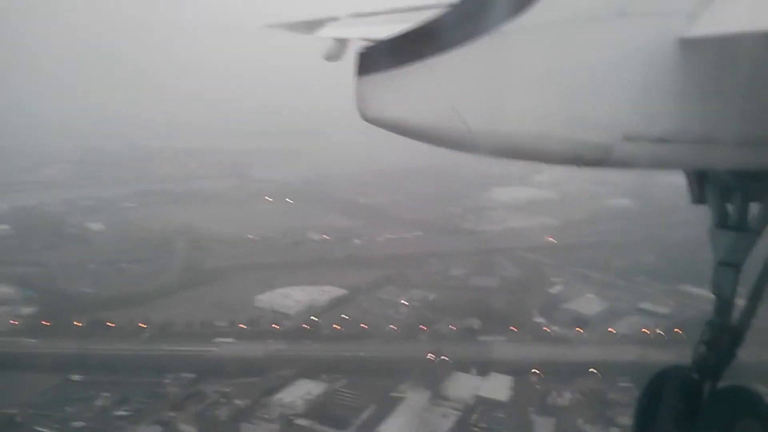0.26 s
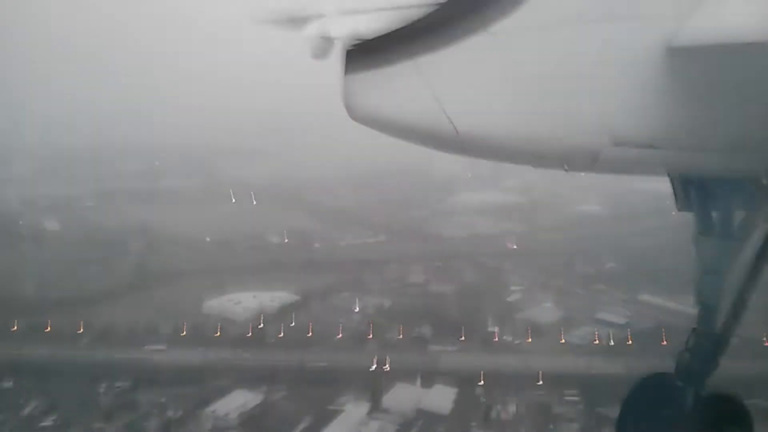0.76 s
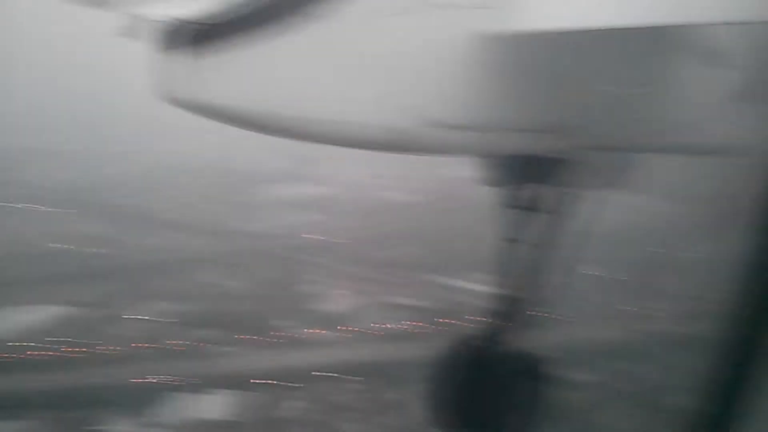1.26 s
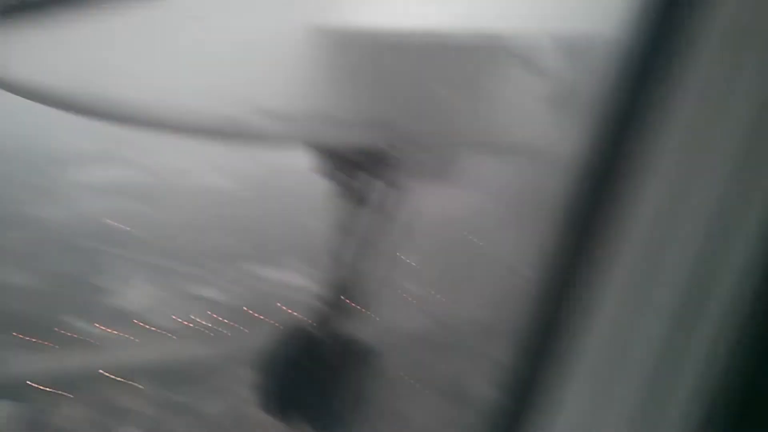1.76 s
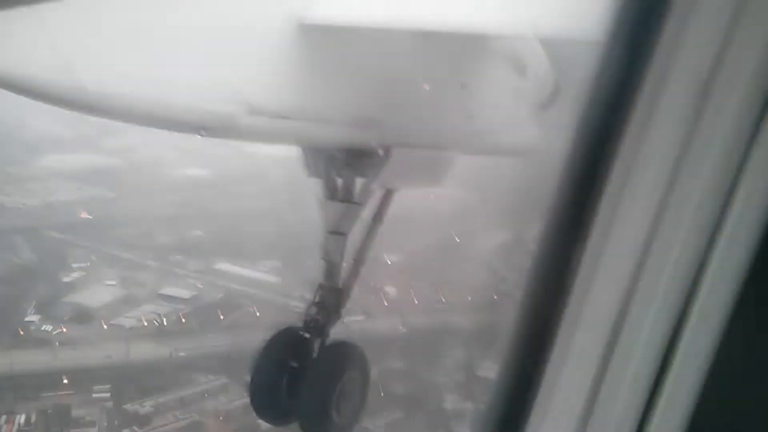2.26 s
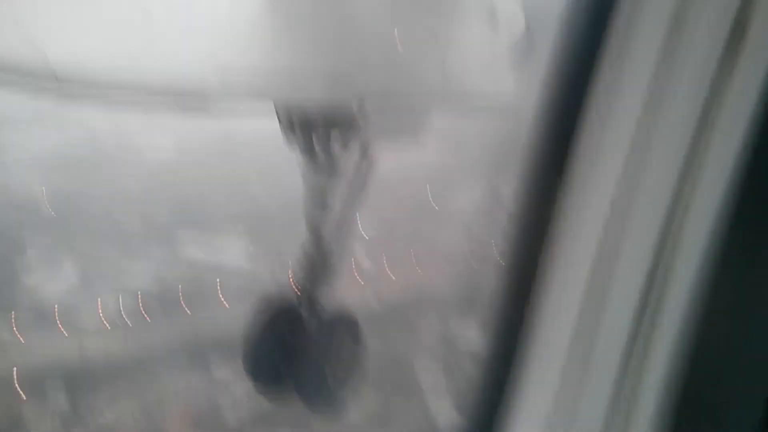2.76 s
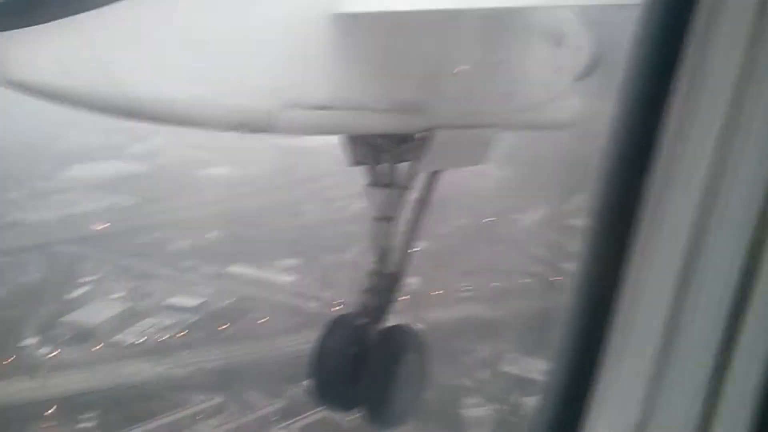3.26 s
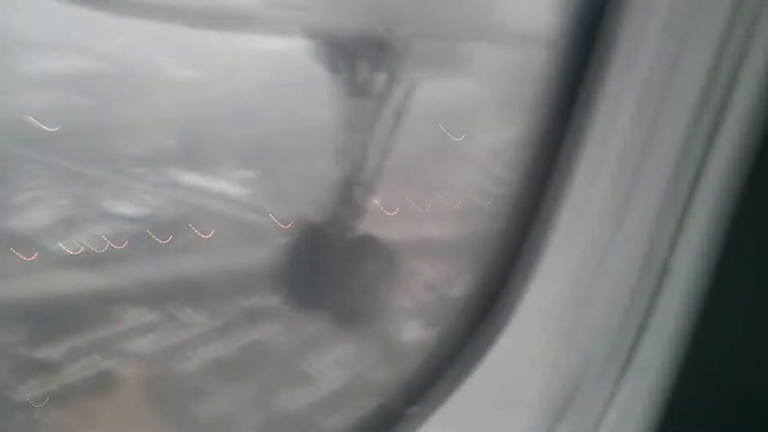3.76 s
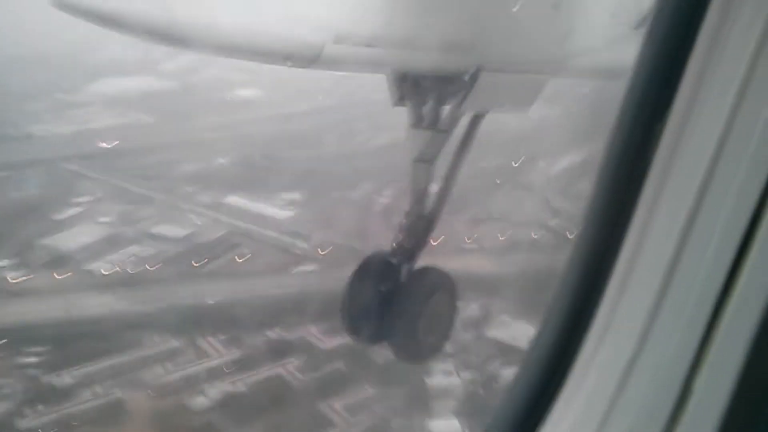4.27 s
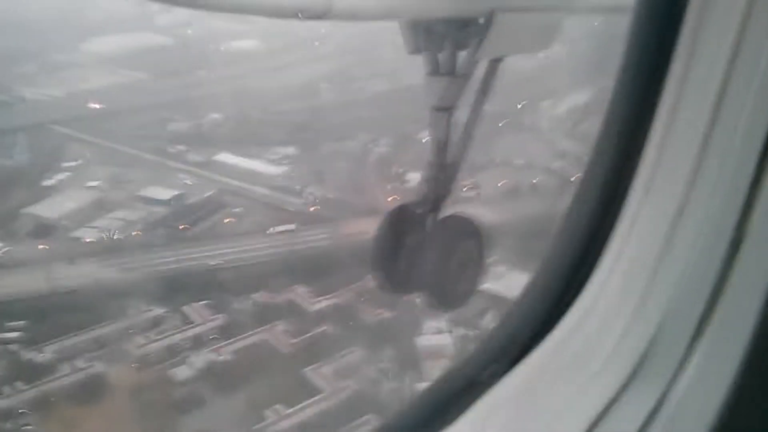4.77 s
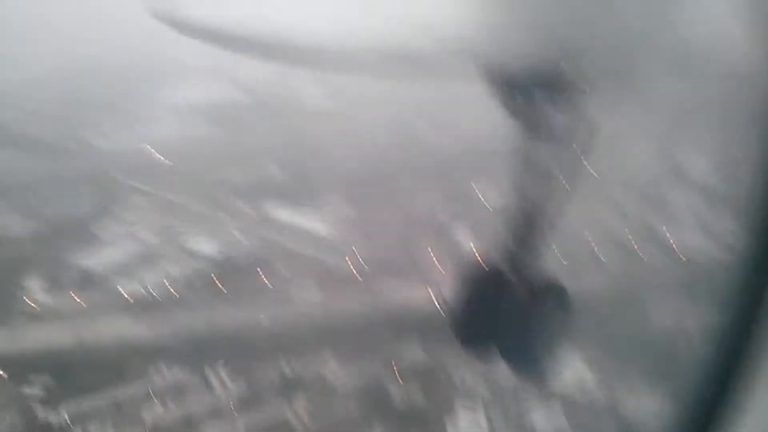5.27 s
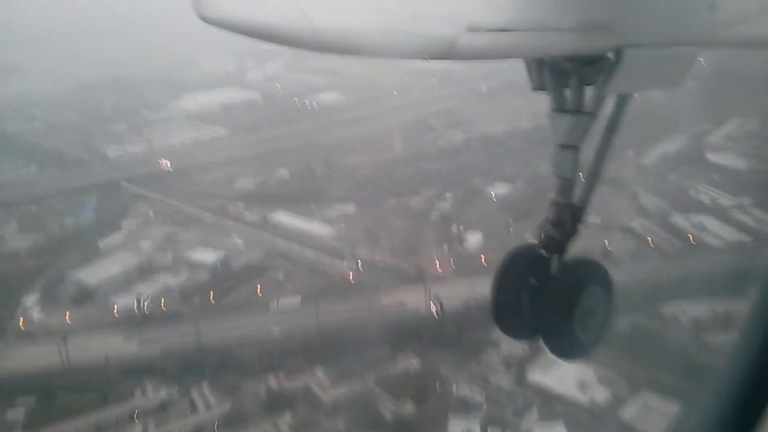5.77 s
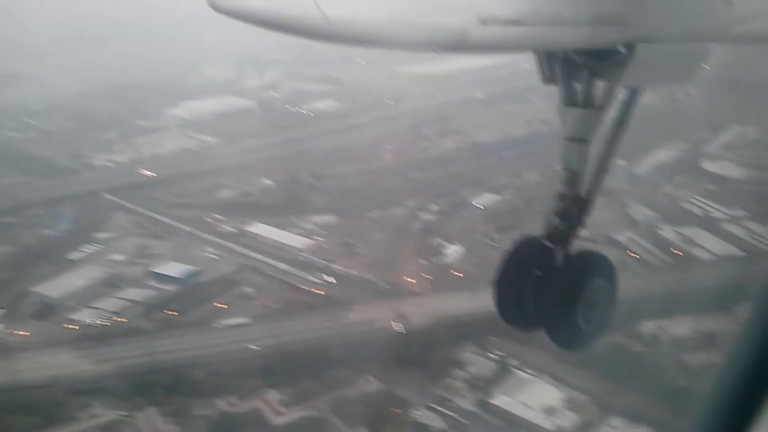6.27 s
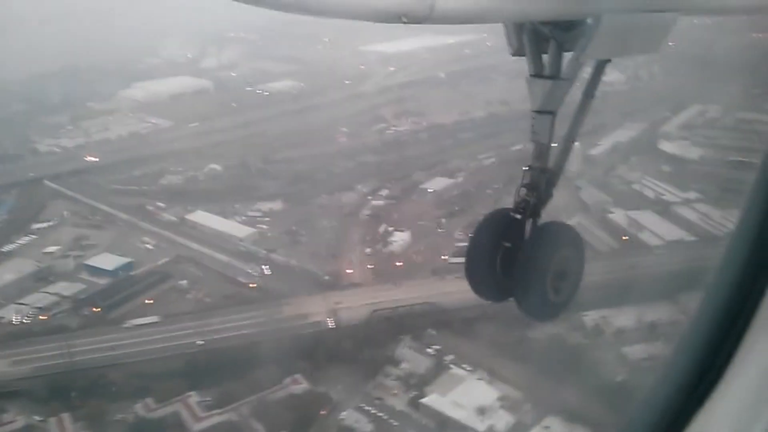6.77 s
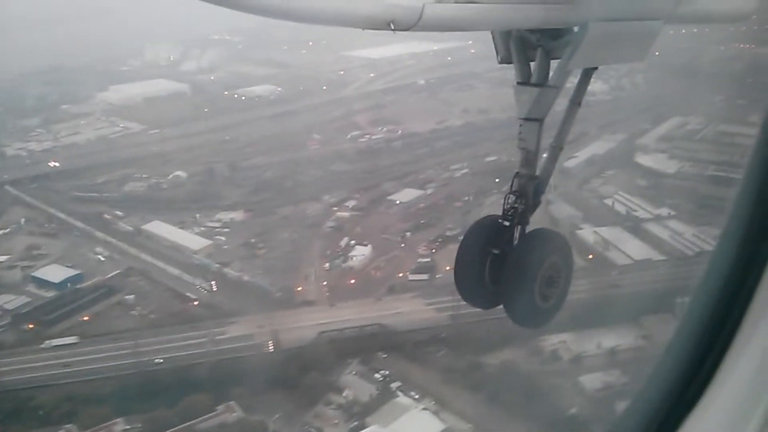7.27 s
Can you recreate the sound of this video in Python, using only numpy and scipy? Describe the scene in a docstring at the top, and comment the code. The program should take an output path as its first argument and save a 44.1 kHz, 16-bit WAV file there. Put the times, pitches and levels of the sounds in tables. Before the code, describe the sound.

Inside a propeller plane on approach, deep buffeting roar and steady engine hum continue while handling snaps and small ticks break through close by.

```python
"""Propeller airliner cabin on approach

Turbulent flow shakes the hull into a lumpy rumble and whoosh, and wall panels boom in the cabin's resonances.
The blades add a low harmonic tone and an overhead vent a bright jet hiss with a window echo.
Narrow bands of cabin noise swell and fade; fittings tick as noise puffs, and snap, knock or ring when struck.
A limiter driven by the bass and a soft saturation shape the sum.
"""
import sys
import numpy as np
from scipy import signal
from scipy.fft import rfft, irfft, next_fast_len
from scipy.io import wavfile
from scipy.ndimage import uniform_filter1d, minimum_filter1d, map_coordinates

SR = 44100
rng = np.random.default_rng(int(sys.argv[2]) if len(sys.argv) > 2 else 0)


def dump_mix(stems):
    """Bounce the given channels to the path in sys.argv[1] as a 16-bit WAV at rate SR."""
    frames = np.atleast_2d(stems).T  # one column per channel
    limited = np.clip(frames, -1, 1)  # hard clip at full scale
    pcm = np.round(limited * 32767).astype(np.int16)
    wavfile.write(sys.argv[1], SR, pcm)


N = 331191  # samples

# Airflow on the hull, before random buffeting: time_s, rumble_db, whoosh_db
AIRFLOW_LEVELS = [(0.0, -10.5, -32.5), (0.4, -21, -34.5), (0.64, -14, -30.5), (1.0, -13, -34.5),
                  (1.29, -9.5, -29), (1.5, -12, -31.5), (1.9, -12.5, -30.5), (2.3, -16, -32),
                  (2.57, -13.5, -32), (2.8, -17.5, -32), (3.0, -10.5, -31), (3.47, -15.5, -31),
                  (3.6, -11.5, -31), (4.13, -9.5, -29.5), (4.3, -13.5, -30), (4.85, -9.5, -27.5),
                  (5.25, -11, -29), (5.75, -12.5, -33), (6.1, -12, -31), (6.56, -12, -30.5),
                  (6.8, -11, -28), (7.1, -11.5, -30), (7.3, -7, -29), (7.51, -14, -29)]
# Booming of the wall panels, before random buffeting: time_s, low_panel_db, high_panel_db
PANEL_LEVELS = [(0.0, -23.5, -24), (0.8, -25.5, -23.5), (1.08, -18.5, -22), (1.35, -28, -23.5),
                (2.0, -28, -26.5), (2.8, -24.5, -28.5), (3.3, -23, -23.5), (4.08, -29, -25.5),
                (4.3, -19, -21.5), (5.2, -14, -18), (5.9, -17.5, -19), (6.8, -12.5, -16.5),
                (7.1, -15, -21.5), (7.51, -10.5, -19.5)]
# Relative noise spectra of the airflow, each: frequency_hz, density_db (per Hz)
RUMBLE_SPECTRUM = [(10, -43), (28, -17), (48, -10), (62, 0.5), (78, 1.5), (95, -0.5), (118, 4), (140, 2.5),
                   (165, -4), (200, -6), (260, -23.5), (400, -52)]
LOW_PANEL_SPECTRUM = [(150, -11.5), (195, -7.5), (235, -0.5), (270, -6), (300, -14.5), (400, -28)]
HIGH_PANEL_SPECTRUM = [(230, -31), (300, -12), (345, -5.5), (393, -3), (470, -10.5), (560, -25.5),
                       (730, -22), (1200, -60)]
WHOOSH_SPECTRUM = [(280, -18), (480, -4), (747, -12), (831, -7), (1060, -10.5), (1420, -14), (1960, -20),
                   (2820, -37), (3400, -33.5), (4420, -34), (7480, -120)]
# Cabin and panel resonances: centre_hz, width_hz, lift_db
CABIN_RESONANCES = [(239, 7.3, 3), (414, 30, 1.5), (451, 5.3, 3), (598, 85, 8), (833, 48, 7)]
# Harmonics of the blade-pass tone: multiple (no unit), level_db (against the rumble)
BLADE_HARMONICS = [(1, -11.5), (2, -18), (3, -25)]
BLADE_PASS_HZ = 83.7  # mean pitch
# Vent jet: time_s, hiss_db, treble_lift_db
VENT_LEVELS = [(0.0, -37.5, 13), (0.56, -39.5, 16), (1.82, -41, 14.5), (2.02, -40.5, 12), (2.2, -52.5, 13),
               (2.9, -48, 12), (3.79, -44, 11), (4.5, -44, 8.5), (5.31, -44.5, 11.5), (5.92, -45, 13.5),
               (6.17, -39.5, 9), (6.46, -43.5, 10.5), (7.51, -46, 11)]
# Relative spectrum of the hiss before the window echo: frequency_hz, density_db (per Hz)
HISS_SPECTRUM = [(1500, -13), (2600, -14), (2900, -43), (3400, -23.5), (4300, -19), (4900, -11.5),
                 (5600, -6.5), (6300, -8.5), (7200, -3), (8100, 5.5), (8900, 2.5), (10200, -8),
                 (12500, -19), (15830, -30)]
# Narrow bands of cabin noise: centre_hz, width_hz, level_db, start_s, end_s
WHINE_BANDS = [(1450, 140, -46, 1.0, 1.6), (1450, 140, -48, 3.7, 5.0), (1390, 90, -42, 6.1, 7.6),
               (1490, 90, -43, 5.8, 7.3), (1140, 90, -45, 4.5, 5.0), (2700, 110, -60, 6.0, 7.1),
               (2720, 150, -61, 0.0, 0.6), (1985, 97, -49, 2.1, 7.6), (3355, 79, -61, 5.9, 7.6),
               (4380, 110, -61, 3.7, 3.98), (4300, 250, -63, 4.5, 5.1), (10250, 500, -53, 1.4, 2.0),
               (10250, 500, -60, 3.7, 5.1), (5550, 200, -63, 1.6, 2.8), (5600, 350, -62, 5.6, 7.6)]
WHINE_FADE_DB_PER_S = 24
# Soft ticks: peak_s, level_db (rms), t60_s, tilt_db (per octave)
TICKS = [(0.1764, -24, 0.055, 3), (3.5735, -39, .012, 12), (3.579, -33, .016, 3), (3.588, -39, 0.2, -8),
         (3.689, -37.5, 0.2, -1), (4.5845, -39, .1, -3), (5.2222, -31, .014, 14), (5.288, -30, 0.07, -3),
         (5.936, -40, 0.16, -2), (6.122, -31, .06, 1), (0.415, -36, .08, 0), (0.606, -33, 0.13, -1),
         (0.7058, -19, 0.035, 0), (0.9654, -33, .05, -8), (1.09, -34, .06, -5), (4.4919, -43, .08, 1),
         (5.182, -35, .03, -1), (6.279, -39, .09, 2), (7.005, -39, .06, -6)]
TICK_RISE_S = 0.0013
# One slow, bright rustle: peak_s, level_db (rms), t60_s, tilt_db (per octave), rise_s
RUSTLE = (1.174, -35, .16, 9, .04)
# Microphone port's relative colour on sharp sounds: frequency_hz, density_db (per Hz)
PORT_SPECTRUM = [(2500, -46), (4200, -15), (5000, 0), (6500, -0.5), (8500, 16.5), (10500, 9.5), (13000, 1),
                 (15800, -3), (16100, -10), (16860, -16)]
# Snaps, knocks and faint rings of struck fittings (-70 dB leaves a part out): start_s, rise_s, crack_db,
# crack_t60_s, port_share (exponent, no unit), body_db, thud_db, ring_db, best_driven_hz,
# fall_off_db (at one octave), tail_db
STRIKES = [(0.6988, .0003, -3, 0.014, .6, -10, -10.5, -7, 1200, 4, -43),
           (0.7015, .001, -70, .02, 1, -70, -70, 5, 9400, 400, -70),
           (2.4545, .0014, -16, 0.06, .85, -60, -16, -5, 7000, 45, -36),
           (3.591, .001, -70, .02, 1, -70, -70, -31, 5900, 150, -70),
           (3.691, .001, -70, .02, 1, -70, -70, -33, 5800, 150, -70),
           (4.2305, .003, -70, .02, 1, -45, -26, -12, 1100, 18, -70),
           (5.2651, .0003, -1, 0.005, .35, -30, -10, -7, 2700, 22, -34)]
# Relative noise spectrum of the struck fitting: frequency_hz, density_db (per Hz)
BODY_SPECTRUM = [(300, -22), (600, 6.5), (1800, 3.5), (2600, -11), (4000, -5), (6500, 0), (9000, -41)]
# Modes of the struck fitting: frequency_hz, level_db (relative), t60_s, blur_rad (random phase step per sample)
FITTING_MODES = [(890, -1, .028, .05), (1300, 0, .022, .06), (1990, 0, .017, .07), (3020, -21, .04, .06),
                 (3690, -6, .026, .05), (4000, -11, .04, .05), (5150, -10, .075, .09), (5500, -11, .06, .1),
                 (5700, -17, .05, .1), (6100, -17, .035, .12), (8450, -10, .04, .08), (9200, -16, .035, .1),
                 (9750, -15, .035, .1), (11300, -4, .06, .12)]
# Relative spectrum of the cabin's answer to a blow: frequency_hz, density_db (per Hz)
TAIL_SPECTRUM = [(2800, -20), (4000, -9), (5500, -9.5), (7000, -9), (8500, 2), (11000, -7), (13000, -16),
                 (15800, -20)]
THUD_HZ, THUD_T60_S, TAIL_T60_S = 518, 0.11, 0.91
# Limiter: highest bass peak let through, time the gain takes to move; then the band limit
LIMIT, LIMIT_S, TOP_HZ = 1.0, .008, 16860


def amp(db):
    """Level in decibels as an amplitude ratio."""
    return 10 ** (np.asarray(db) / 20)


def unit(x):
    """Normalisation to rms 1."""
    return x / np.sqrt(np.mean(x ** 2) + 1e-20)


def along(points, hz):
    """Spectral envelope: gain interpolated on a log-frequency axis, -120 dB outside the points."""
    f, db = np.transpose(points)
    return amp(np.interp(np.log(hz + 1), np.log(f + 1), db, left=-120, right=-120))


def curves(rows):
    """Linear interpolation: one value per sample for each column after the time."""
    s, *columns = np.transpose(rows)
    return [np.interp(np.arange(N) / SR, s, column) for column in columns]


def wobble(rate):
    """Slow random fluctuation: a smooth spline through random knots, rate of them a second."""
    knots = rng.standard_normal(int(N * rate / SR) + 4)
    return map_coordinates(knots, [np.arange(N) * rate / SR])


def filtered(x, response):
    """Linear filtering: the spectrum of x times a response of frequency."""
    m = next_fast_len(len(x) + 8192)
    return irfft(rfft(x, m) * response(np.fft.rfftfreq(m, 1 / SR)), m)[:len(x)]


def rush(response, patchy_db):
    """Turbulent noise of rms 1: random gain patches in time and frequency, then a spectral response."""
    z = signal.stft(rng.standard_normal(N + 2048), nperseg=1024)[2]
    field = uniform_filter1d(rng.standard_normal(z.shape), size=6, axis=0)
    field = uniform_filter1d(field, size=6, axis=1)
    patchy = signal.istft(z * amp(patchy_db * unit(field)), nperseg=1024)[1][:N]
    return unit(filtered(patchy, response))


def cabin(hz):
    """Resonance: each mode lifts a narrow band around its centre."""
    return amp(sum(lift_db / (1 + (2 * (hz - centre) / width) ** 2)
                   for centre, width, lift_db in CABIN_RESONANCES))


def airflow():
    """Flow-induced vibration: lumpy rumble, two booming panels and a smoother whoosh share one buffeting."""
    rumble_db, whoosh_db = curves(AIRFLOW_LEVELS)
    low_db, high_db = curves(PANEL_LEVELS)
    buffet = wobble(8)

    rumble = rush(lambda hz: along(RUMBLE_SPECTRUM, hz), patchy_db=1.8)
    rumble *= amp(rumble_db + 1.65 * buffet + 2.57 * wobble(20))
    low_panel = rush(lambda hz: along(LOW_PANEL_SPECTRUM, hz) * cabin(hz), patchy_db=3.0)
    low_panel *= amp(low_db + 0.16 * buffet + 2.03 * wobble(15))
    high_panel = rush(lambda hz: along(HIGH_PANEL_SPECTRUM, hz) * cabin(hz), patchy_db=3.0)
    high_panel *= amp(high_db + 0.44 * buffet + 1.18 * wobble(16))
    whoosh = rush(lambda hz: along(WHOOSH_SPECTRUM, hz) * cabin(hz), patchy_db=1.6)
    whoosh *= amp(whoosh_db + .2 * buffet + 1.1 * wobble(18))
    return rumble + low_panel + high_panel + whoosh


def propellers():
    """Blade-pass harmonics: a wandering tone carried by the hull, so its level follows the rumble curve."""
    phase = 2 * np.pi * np.cumsum(BLADE_PASS_HZ + 0.754 * wobble(3)) / SR
    tone = sum(np.sqrt(2) * amp(db + 2.86 * wobble(4.5)) * np.sin(k * phase) for k, db in BLADE_HARMONICS)
    return amp(curves(AIRFLOW_LEVELS)[0]) * tone


def vent():
    """Comb filtering: jet hiss meets its delayed echo off the window, and the comb blurs out at high treble."""
    hiss_db, treble_lift_db = curves(VENT_LEVELS)

    def pane(hz):
        """Interference of the direct hiss with an echo 2.98 ms late."""
        return 1 + 1.46 * np.exp(-(hz / 4800) ** 4) * np.exp(-2j * np.pi * hz * .00298)

    hiss = rush(lambda hz: along(HISS_SPECTRUM, hz) * pane(hz), patchy_db=1.2)
    treble = filtered(hiss, lambda hz: 1 / (1 + (11500 / (hz + 1)) ** 8))
    dull = filtered(hiss, lambda hz: 1 / (1 + (hz / 6800) ** 12))
    # the dull part carries round corners: it follows the level only in part
    steady = amp(.5 * (np.mean(hiss_db) - hiss_db)) * dull
    jet = hiss - dull + steady + (amp(treble_lift_db) - 1) * treble
    return amp(hiss_db + 0.24 * wobble(12)) * jet


def whines():
    """Narrow-band noise: each resonance-shaped band flickers, with one fade rate before start and after end."""
    t = np.arange(N) / SR
    out = np.zeros(N)
    for centre, width, db, start, end in WHINE_BANDS:
        outside_s = np.abs(t - np.clip(t, start, end))
        level = amp(db - WHINE_FADE_DB_PER_S * outside_s + 2.4 * wobble(11))
        out += level * rush(lambda hz: 1 / (1 + (2 * (hz - centre) / width) ** 2), patchy_db=4.0)
    return out


def clicks():
    """Transient noise: each puff swells exponentially to its peak, then decays with a faint slower tail."""
    out, t = np.zeros(N + SR), np.arange(-SR // 8, SR // 2) / SR
    puffs = [(*row, TICK_RISE_S) for row in TICKS] + [RUSTLE]
    for s, db, t60, tilt_db, rise in puffs:
        # the tilt pivots at 8500 Hz
        noise = unit(filtered(rng.standard_normal(len(t)),
                              lambda hz: along(PORT_SPECTRUM, hz) * amp(tilt_db * np.log2((hz + 1) / 8500))))
        decay = amp(-60 * t / t60) + amp(-16 - 60 * t / 1.0)
        shape = np.where(t < 0, np.exp(t / rise), decay)
        out[round(s * SR) - SR // 8:][:len(t)] += amp(db) * noise * shape
    return out[:N]


def struck_fittings():
    """Impact excitation: a blow mixes crack, body noise, modes near its best-driven pitch, thud and tail."""
    out, t = np.zeros(N + SR), np.arange(SR) / SR

    def burst(response):
        """Spectral shaping of white noise."""
        return unit(filtered(rng.standard_normal(len(t)), response))

    for (s, rise, crack_db, crack_t60, share, body_db, thud_db,
         ring_db, best_hz, fall_db, tail_db) in STRIKES:
        crack = burst(lambda hz: along(PORT_SPECTRUM, hz) ** share) * amp(crack_db - 60 * t / crack_t60)
        tail = burst(lambda hz: along(TAIL_SPECTRUM, hz)) * amp(tail_db - 60 * t / TAIL_T60_S)
        # the body dies fast, then slowly from a lower level
        body_decay = amp(body_db - 60 * t / 0.042) + amp(body_db - 23 - 60 * t / 0.46)
        body = burst(lambda hz: along(BODY_SPECTRUM, hz)) * body_decay
        ring = np.zeros(len(t))
        for hz, mode_db, t60, blur in FITTING_MODES:
            drive_db = ring_db + mode_db - fall_db * np.log2(hz / best_hz) ** 2
            drift = np.cumsum(blur * rng.standard_normal(len(t)))
            ring += amp(drive_db - 60 * t / t60) * np.sin(2 * np.pi * hz * t + drift)
        thud = amp(thud_db - 60 * t / THUD_T60_S) * np.sin(2 * np.pi * THUD_HZ * t)
        onset = 1 - np.exp(-t / rise)
        out[round(s * SR):][:len(t)] += (crack + tail + body + ring + thud) * onset
    return out[:N]


def scene():
    """Superposition: all sources add at one microphone."""
    return (airflow() + propellers() + vent() + whines() + clicks() + struck_fittings())[None]


def record(dry):
    """Bass-driven limiting, saturation and a band limit: strong bass lowers and squashes the treble riding on it."""
    bass = filtered(dry[0], lambda hz: 1 / (1 + (hz / 700) ** 4))
    size = round(LIMIT_S * SR)
    # the lowest gain needed nearby, smoothed, so the gain moves ahead of each peak
    need = minimum_filter1d(LIMIT / np.maximum(np.abs(bass), LIMIT), size=2 * size)
    held = dry[0] * uniform_filter1d(need, size=size)
    soft = held / (1 + np.abs(held) ** 8) ** (1 / 8)
    return np.clip(filtered(soft, lambda hz: hz < TOP_HZ), -1, 1)[None]


dry = scene()
out = record(dry)
dump_mix(out)
```